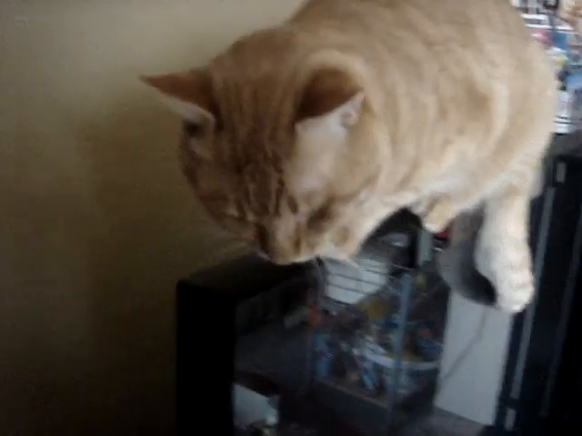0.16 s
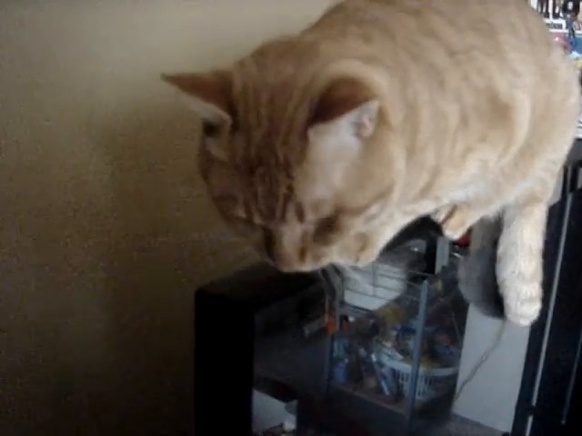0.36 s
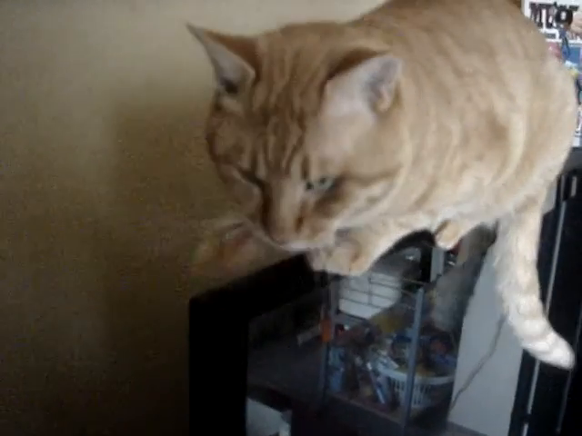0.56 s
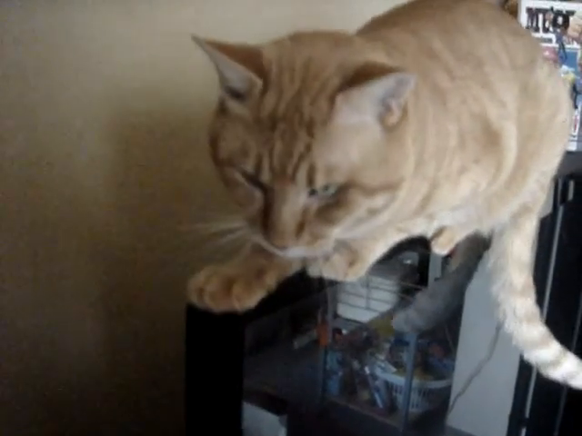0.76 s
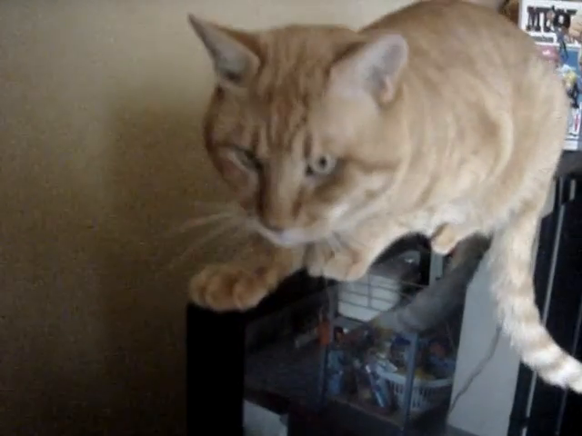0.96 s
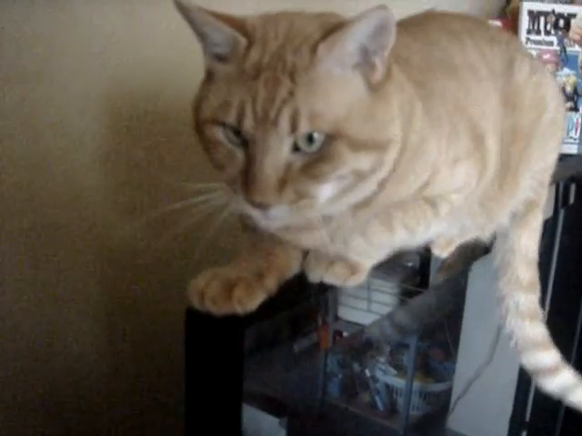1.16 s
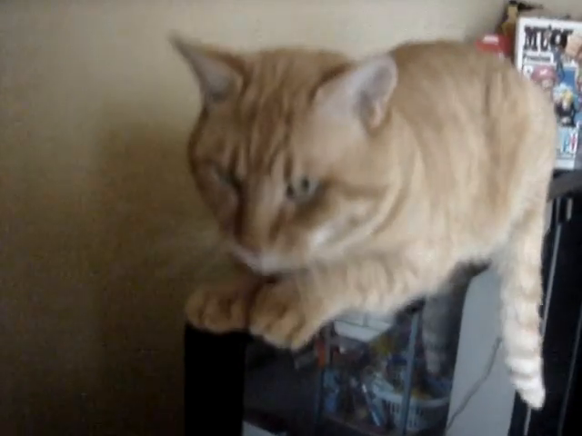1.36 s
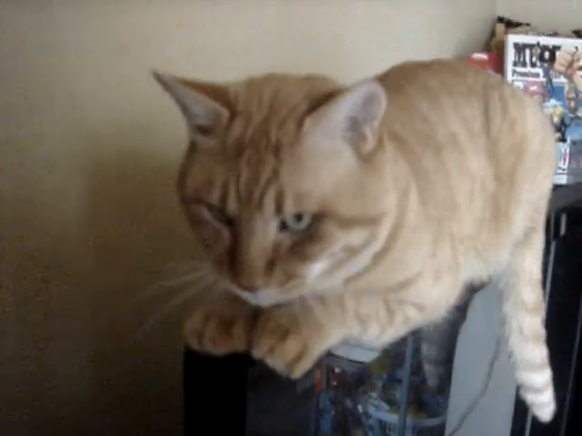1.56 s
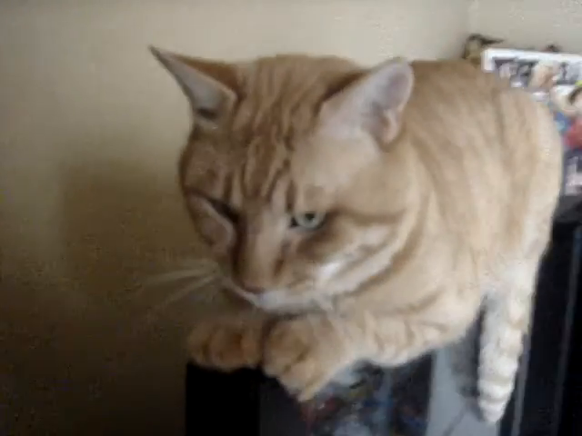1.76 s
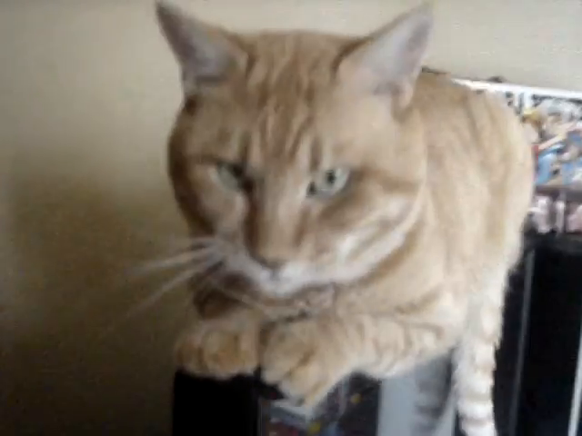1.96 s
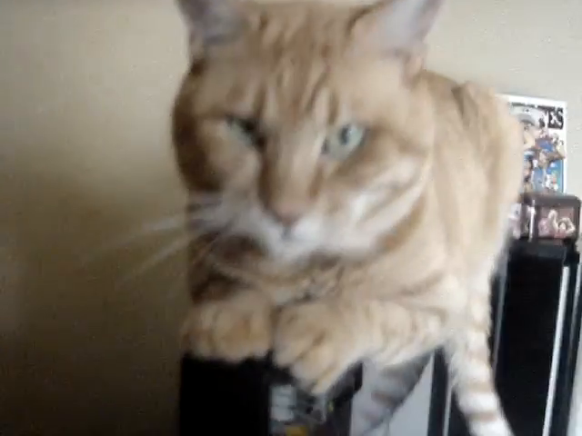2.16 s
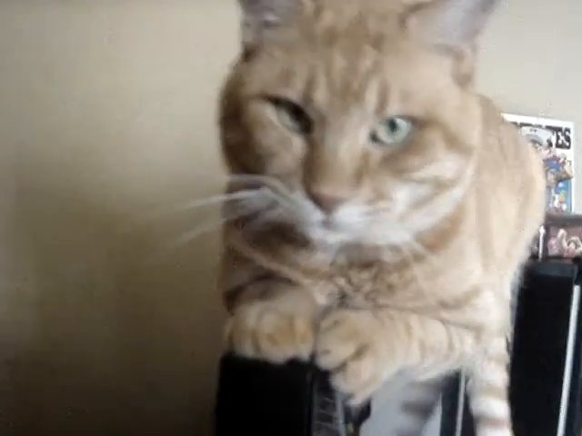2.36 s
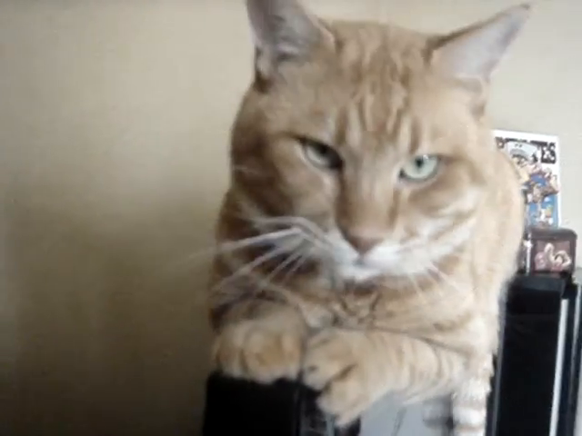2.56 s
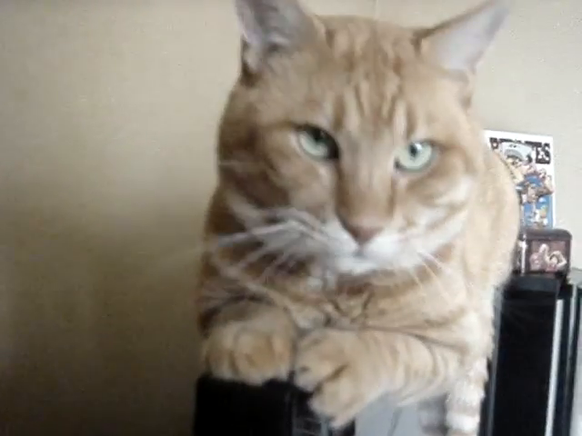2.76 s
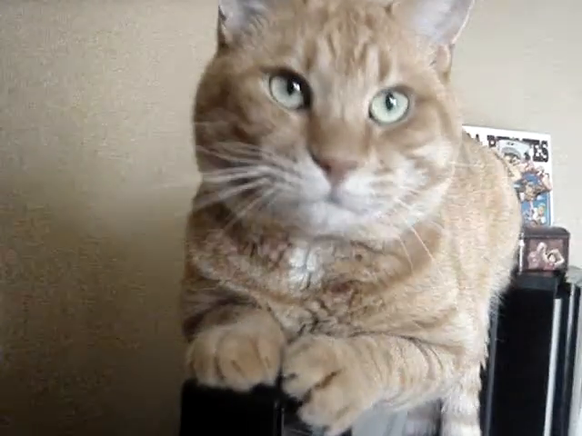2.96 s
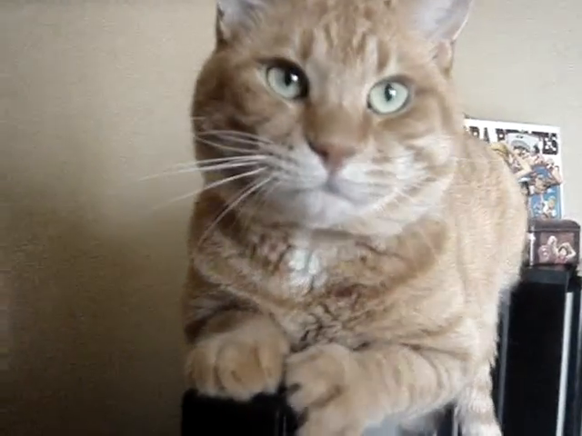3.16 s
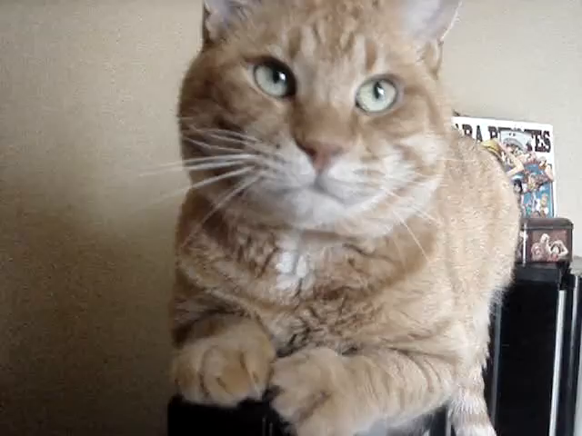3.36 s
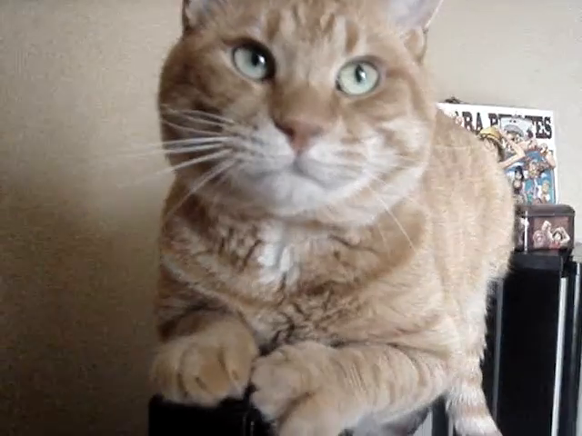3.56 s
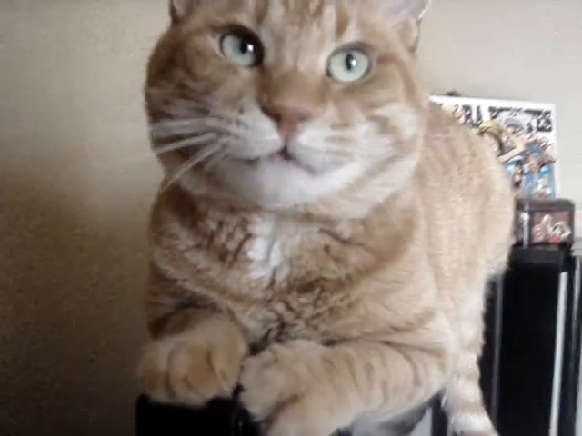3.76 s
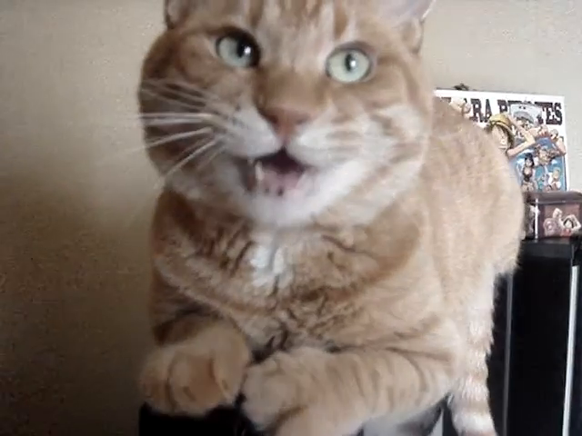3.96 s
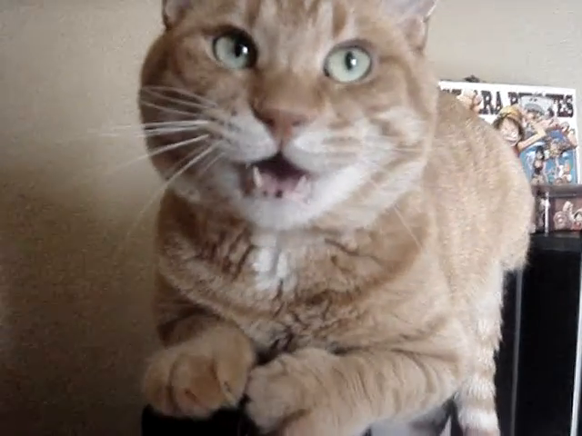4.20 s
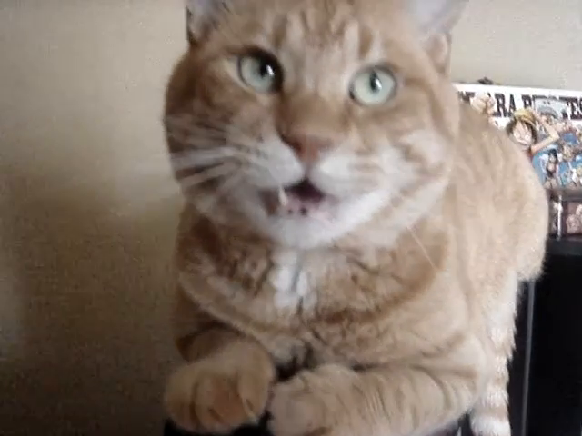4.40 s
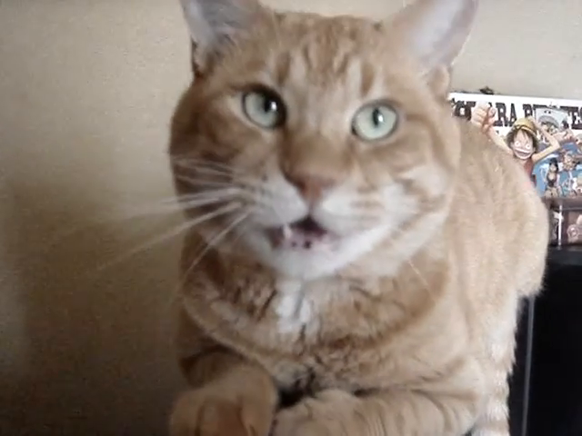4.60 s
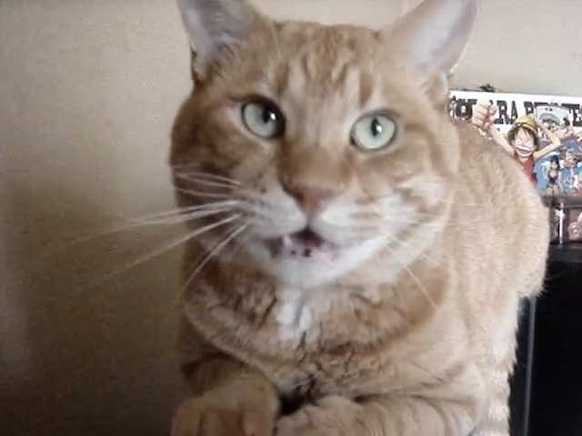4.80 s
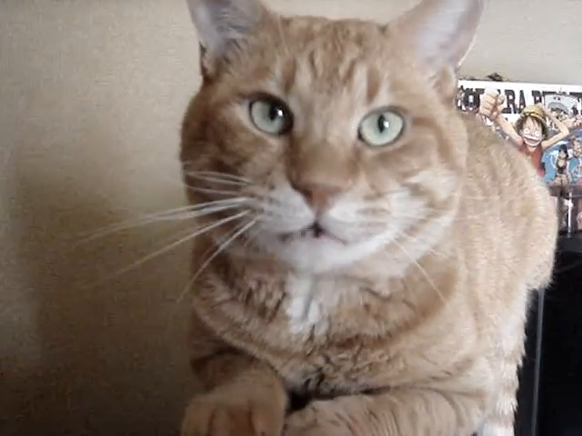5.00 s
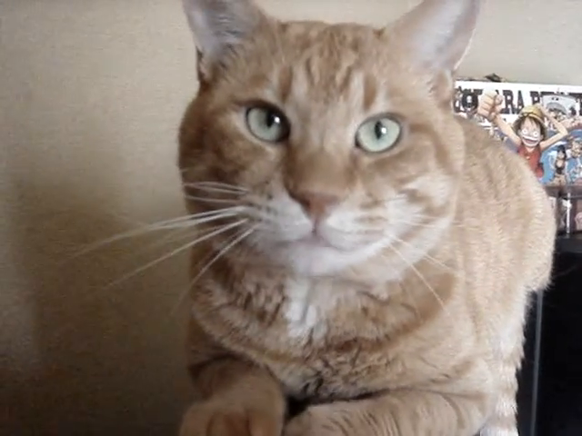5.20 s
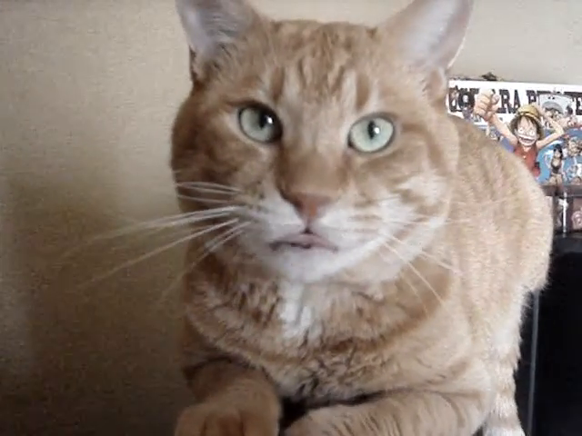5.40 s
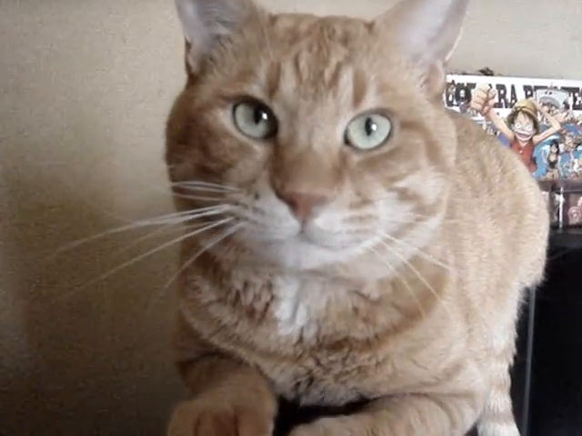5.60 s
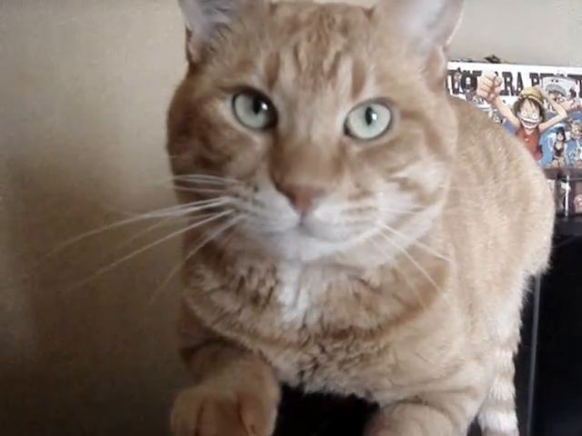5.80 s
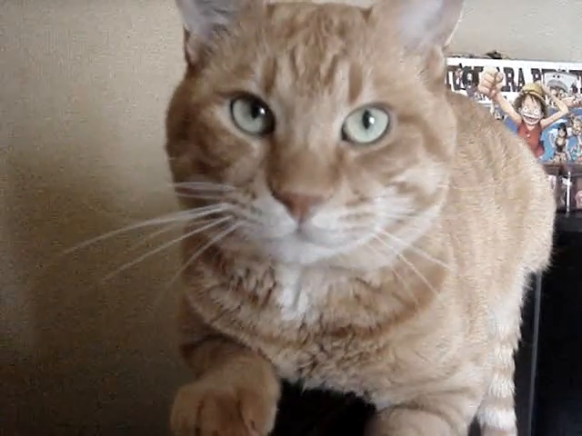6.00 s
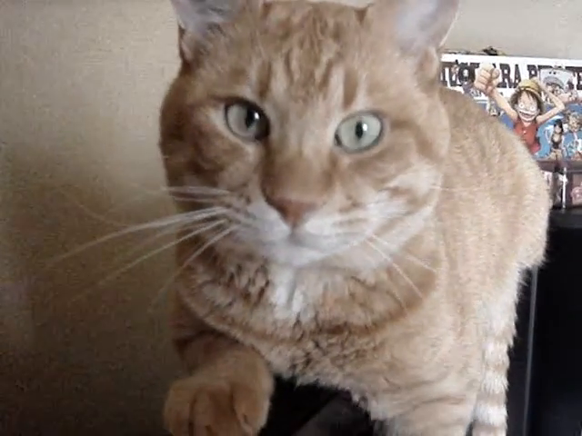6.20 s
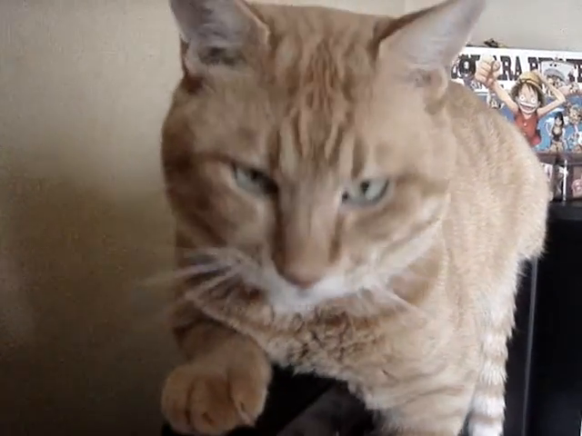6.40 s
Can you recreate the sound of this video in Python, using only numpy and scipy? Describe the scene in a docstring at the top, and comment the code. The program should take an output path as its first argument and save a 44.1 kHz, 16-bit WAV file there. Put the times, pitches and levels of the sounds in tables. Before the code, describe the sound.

A quiet small room heard through a thin little microphone, with steady soft hiss and low murmur. A faint rapid mechanical tick, about thirty stronger pulses a second, runs until 1.2 s, returns around 2.1 to 2.9 s, then continues weaker until about 6 s. Paws tap and scuff a cabinet softly at 0.55, 0.7, 0.9 and 1.25 s, then around 2.1 to 2.25 s; small finger knocks and dry ticks fall between, including a dull pop at 1.9 and 3.2 s. From 3.6 s the close cat begins a creaky, fluttering onset, rises quickly into a full, bright, nasal meow by 3.9 s, holds and slowly sinks in pitch, then breaks into a breathy purring flutter, ending near 5.0 s with a soft tap. Faint scuffs follow at 5.3 to 5.7 s, a sharper click at 5.73, and tiny clicks near 6.0 to 6.4 s. Very little echo.

```python
"""In a small room, a cat on a cabinet gives one long meow close to a pocket camera.
The call is a stack of harmonics and breath noise, with a purring flutter at its start and end.
Noise bursts ring the cabinet for tapping, scuffing paws; short swings are knocks and finger pops.
A small drive in the camera ticks as evenly timed rings, and the sounds of the cat echo faintly.
Shaped noise makes the microphone hiss and the murmur of the room."""
import sys
import numpy as np
from scipy import signal
from scipy.io import wavfile
from scipy.ndimage import uniform_filter1d

SR = 44100
rng = np.random.default_rng(int(sys.argv[2]) if len(sys.argv) > 2 else 0)


def generate_wav(signal):
    """Clip the signal to [-1, 1] and save it as 16-bit WAV at the path in sys.argv[1]."""
    frames = np.transpose(np.atleast_2d(signal))
    scaled = np.clip(frames, -1, 1) * 32767
    pcm = np.round(scaled).astype(np.int16)
    wavfile.write(sys.argv[1], SR, pcm)


N = 284356  # length in samples

# The call before flutter and unevenness: t/s, pitch f/Hz, level of the fundamental/dB
CALL = [(3.62, 229, -64), (3.63, 232, -53), (3.652, 238, -51), (3.745, 279, -45.5), (3.77, 297, -41),
        (3.805, 326, -38.5), (3.85, 343, -39.5), (3.9, 360, -36), (4.1, 358.5, -34.5), (4.24, 349, -34.5),
        (4.37, 339, -35), (4.47, 338, -36), (4.56, 333, -36.5), (4.65, 328, -38), (4.72, 324.5, -36),
        (4.8, 318.5, -35), (4.9, 307, -38), (4.98, 288, -41), (5.02, 245, -58)]
# Moving jaw and tongue, levels over the fundamental: t/s, first resonance f/Hz, level/dB,
# second resonance f/Hz, level/dB, lift of the third and fifth/dB, lift of the throat resonances/dB
JAW_AND_TONGUE = [(3.63, 446, 6, 1230, -3.5, -7, -12), (3.73, 704, 6, 1320, -3, -23, -10),
                  (3.78, 740, -5.5, 1260, -9, -9, -4), (3.88, 733, 1, 1660, -6, -11, -8),
                  (3.94, 680, 7, 1600, -10.5, -5.5, -3), (4.03, 734, 6, 1630, -4.5, 2, -1.5),
                  (4.16, 800, 7.5, 1700, -1, -6.5, -6), (4.3, 853, 7.5, 1560, -5, -5.5, 1),
                  (4.43, 810, 5.5, 1480, -5.5, 0.5, -3.5), (4.58, 810, 6, 1530, -6.5, -1.5, 3.5),
                  (4.72, 815, 2.5, 1430, -14.5, -6.5, -4), (4.82, 824, -2.5, 1310, -19, -9.5, -12),
                  (4.9, 846, -2.5, 1690, -14, -9.5, -7), (5.0, 830, 3.5, 1450, -10, -7, -3)]
# The purr muscle pinches the larynx shut: t/s, dip/dB, pitch drop (share of the pitch)
PURR_PINCHES = [(3.671, 14, .06), (3.709, 7, .11), (3.747, 3.5, .12), (3.79, 1, .03), (4.822, 1, .045),
                (4.868, 1.5, .11), (4.914, 4, .16), (4.957, 8, .14), (4.989, 13, .12)]
# Widths of the first and second resonance: width/Hz
MOVING_WIDTHS = (144, 212)
# Resonances that stay at one pitch, before their lift: f/Hz, width/Hz, level over the fundamental/dB
THIRD_RESONANCE = (2492, 150, -5)
FIFTH_RESONANCE = (4300, 250, -34)  # swells with the third
THROAT_RESONANCES = [(3042, 138, -12.5), (3400, 200, -24), (6120, 420, -32.5)]
# Unevenness of the vocal folds (0 to 1), strong at both ends of the call
CREAK_STEADY, CREAK_IN, CREAK_OUT = .04, .62, .85
CREAK_IN_S, CREAK_OUT_S = .16, .065

# Taps and scuffs on the cabinet and of the lips: t/s, level before a final factor of 0.4/dB, rise/s,
# time to fall 60 dB/s, lift of the upper body modes/(dB per octave), treble over body/dB, treble f/Hz
PAW_CONTACTS = [(0.553, -40.5, .006, 0.13, 15, -2.5, 3560), (0.6944, -44, 0.00098, 0.13, 10, 9, 2400),
                (.912, -30.5, 0.0028, .16, 1, -20, 2500), (1.253, -43.5, 0.0093, 0.11, 4, -24, 3020),
                (1.3, -57.5, 0.028, 0.15, 5, 15, 2480), (2.096, -38.5, 0.015, 0.19, 2.5, -24, 2660),
                (2.21, -37, 0.0078, 0.53, -5, -23, 2500), (2.241, -33.5, .0085, 0.17, -18, -26, 3000),
                (3.814, -56, 0.021, 0.082, -3, 14.5, 2980), (4.989, -35, 0.0072, 0.2, -4, -4, 2380),
                (5.34, -44.5, 0.0096, 0.53, 16, -27, 2500), (5.561, -42, 0.0071, 0.35, 27, -3.5, 3000),
                (5.691, -45.5, 0.025, 0.65, 23, 0.5, 2940), (5.7328, -37.5, .0016, 0.14, -17, 1, 4470)]
# Body resonances of the cabinet, before the lift: f/Hz, width/Hz, level/dB
CABINET_MODES = [(250, 120, -9.5), (422, 123, 7), (560, 200, -32), (920, 150, -1.5), (1255, 330, -14.5)]
# Claw resonances: multiple of the treble f, width/Hz, level/dB
CLAW_MODES = [(.45, 1200, -12), (1.0, 1700, 5), (1.7, 2300, -2), (2.8, 4000, -17)]

# Fingers and claws, dull pops to dry ticks: t/s, peak of the main swing/dB, f/Hz,
# length/cycles, overtone over main swing/dB
FINGER_KNOCKS = [(.695, -31, 3040, .55, -8), (1.1405, -36.5, 2580, 4, -25),
                 (1.7701, -35.5, 2080, 0.69, 4.5), (1.9146, -28, 820, 0.49, -7),
                 (2.1092, -32, 2580, 1.7, -25), (3.1851, -29.5, 304, 0.48, -18),
                 (3.8403, -38.5, 2370, 3.5, -2.5), (4.1123, -30.5, 233, .34, -2.5),
                 (4.512, -38, 220, 0.6, -18), (5.005, -28, 1311, 0.2, -22), (5.4445, -41, 4750, 2.5, -30),
                 (5.734, -25.5, 4300, 0.54, -20), (6.0374, -35.5, 340, 0.17, 0),
                 (6.126, -41, 3070, .59, -8), (6.3608, -37, 2960, .39, -8), (6.368, -33, 3000, 0.28, 0),
                 (6.382, -35, 2500, 0.23, -6)]
OVERTONE_RATIO, OVERTONE_LAG_S = 2.43, 0.00089
OVERTONE_CYCLES = 1.8  # the overtone's length in cycles, as a multiple of the main swing's

# Spells of ticking, before the step pattern: start t/s, end t/s, level/dB
TICKING_SPELLS = [(-.3, 1.2, -42.5), (2.1, 2.9, -43), (2.9, 6.0, -49)]
# Repeating strength of the steps, one in four stands out: level/dB
STEP_PATTERN = (-13, -12, 6, -15)
DRIVE_PER_S, DRIVE_START_S = 119.88, .0068
DRIVE_FADE_DB_PER_S = 126  # fades in and out around each spell

# Colour of hiss and murmur, only its shape counts: f/Hz, level/(dB per Hz)
HISS_COLOUR = [(15, -31), (25, -3), (124, -6.5), (152, 0.5), (239, -4.5), (322, 0), (356, -1.5),
               (470, -3.5), (684, -3.5), (1690, -8), (2460, -8.5), (3320, -12), (10000, -15), (13000, -113),
               (22000, -120)]
HISS_DB = -54  # overall level before the microphone
ROOM_DB = -22  # the cat sits close, so the room stays faint
EDGE_HZ = 10150  # top of the recorded band


def meow():
    """Harmonics take their levels from the mouth's resonances; breath has its own fixed ones."""
    t = np.arange(CALL[0][0], CALL[-1][0], 1 / SR)
    hz, level_db = curve(CALL, t)
    for s, dip_db, drop in PURR_PINCHES:
        # shuts slowly, bursts open
        dip_width_s = np.where(t < s, .009, .003)
        level_db = level_db - dip_db * np.exp(-((t - s) / dip_width_s) ** 2)
        # slack folds climb back to pitch
        hz = hz * (1 - drop * np.exp(-abs(t - s) / .018) * (t > s))

    creak = CREAK_STEADY + CREAK_IN * np.exp(-((t - t[0]) / CREAK_IN_S) ** 2)
    creak = creak + CREAK_OUT * np.exp((t - t[-1]) / CREAK_OUT_S)
    pitch_wobble, level_wobble = smooth_random((2, len(t)), 200, 100)
    drift = smooth_random(len(t), 1500, 700)
    sung_hz = uniform_filter1d(hz, size=200) * (1 + .045 * creak * pitch_wobble + .003 * drift)
    turns = np.cumsum(sung_hz) / SR  # cycles of the fundamental so far

    first_hz, first_db, second_hz, second_db, third_db, top_db = curve(JAW_AND_TONGUE, t)
    shapes = [(first_hz, MOVING_WIDTHS[0], first_db), (second_hz, MOVING_WIDTHS[1], second_db)]
    shapes += [(f, w, db + third_db) for f, w, db in (THIRD_RESONANCE, FIFTH_RESONANCE)]
    shapes += [(f, w, db + top_db) for f, w, db in THROAT_RESONANCES]

    voice = np.cos(2 * np.pi * turns)
    shimmer = evened(uniform_filter1d(rng.standard_normal((22, len(t) // 64 + 1)), size=25))
    for k, chance in enumerate(shimmer, 2):  # k is the harmonic number
        tract = 0
        for j, (f, w, db) in enumerate(shapes):
            # a one-pole response squared: steep skirts, and the phase turns across each peak
            tract = tract + (-1) ** j * gain_of(db) / (1 + 1j * (k * hz - f) / w) ** 2
        waver = gain_of(.5 * np.interp(np.arange(len(t)), np.arange(len(chance)) * 64, chance))
        # uneven cycles smear each harmonic
        blur = evened(uniform_filter1d(rng.standard_normal((2, len(t))), size=260))
        smear = (.014 * k + .5 * creak) * (blur[0] + 1j * blur[1])
        waver = waver * (1 - .4 * creak + smear)
        voice = voice + (waver * tract * np.exp(2j * np.pi * k * turns)).real

    # the breath puffs once per cycle
    air = rng.standard_normal(len(t)) * (0.21 + np.cos(np.pi * turns) ** 2)
    breath = resonate(air, 630, 900) + 0.86 * resonate(air, 2000, 1200)
    breath = evened(breath + 0.25 * resonate(air, 6000, 1500))
    voice = voice + gain_of(-25 + 12.0 * creak) * breath  # more breath where the folds are uneven

    loudness = np.sqrt(2) * gain_of(level_db + 2.5 * creak * level_wobble)
    out = np.zeros(N)
    add(out, t[0], loudness * voice * signal.windows.tukey(len(t), .012))
    return out


def paws():
    """A grainy burst of contact noise rings the cabinet and, brighter and shorter, the claws."""
    out, t = np.zeros(N), np.arange(SR // 3) / SR
    for s, db, rise, t60, lift_db, treble_db, hz in PAW_CONTACTS:
        grains = gain_of(2.5 * rng.standard_normal(len(t) // 50 + 1)).repeat(50)[:len(t)]
        grit = rng.standard_normal(len(t)) * grains
        body = evened(sum(gain_of(d + lift_db * np.log2(f / 420)) * resonate(grit, f, w)
                          for f, w, d in CABINET_MODES))
        # passing each claw resonance twice makes it steeper
        treble = evened(sum(gain_of(d) * resonate(resonate(grit, k * hz, w), k * hz, w)
                            for k, w, d in CLAW_MODES))
        shape = np.minimum(t / rise, 1) * gain_of(-60 * np.maximum(t - rise, 0) / t60)
        burst = body + gain_of(treble_db) * treble * shape ** .25
        add(out, s, .4 * gain_of(db) * shape * burst)
    return out


def knocks():
    """Each knock is one short swing with an overtone, mostly weaker, on its heels."""
    out, t = np.zeros(N), np.arange(1500) / SR
    for s, db, hz, cycles, overtone_db in FINGER_KNOCKS:
        add(out, s, gain_of(db) * swing(hz, cycles, t))
        overtone = swing(OVERTONE_RATIO * hz, OVERTONE_CYCLES * cycles, t)
        add(out, s + OVERTONE_LAG_S, gain_of(db + overtone_db) * overtone)
    return out


def swing(hz, cycles, t):
    """A sine that swells and dies, faster for fewer cycles; its peak is 1."""
    u = hz * t / cycles
    x = np.sin(2 * np.pi * hz * t) * u * np.exp(-1.6 * u)
    return x / abs(x).max()


def drive():
    """Evenly timed steps of uneven strength ring the case near the microphone."""
    at = np.arange(DRIVE_START_S, N / SR, 1 / DRIVE_PER_S)
    spells = []
    for start, end, db in TICKING_SPELLS:
        outside_s = np.maximum(np.maximum(start - at, at - end), 0)
        spells.append(db - DRIVE_FADE_DB_PER_S * outside_s)
    step_db = np.max(spells, axis=0) + np.resize(STEP_PATTERN, len(at))
    step_db = step_db + 3.0 * rng.standard_normal(len(at))
    steps = np.zeros(N)
    steps[(at * SR).astype(int)] = gain_of(step_db)
    t = np.arange(400) / SR
    ring = np.sin(2 * np.pi * 2750 * t) * (t / 0.0016) * np.exp(1 - t / 0.00042)
    return np.convolve(steps, ring)[:N]


def room(x):
    """Echoes are sparse taps of random sign that die away; treble is weaker but dies a bit later."""
    taps, at = np.zeros(SR // 2), np.arange(200, SR // 2 - 20, 20)
    taps[at + rng.integers(0, 20, len(at))] = rng.choice([-1., 1.], len(at))
    t = np.arange(len(taps)) / SR
    low = uniform_filter1d(taps, size=12)
    high = taps - low
    tail = low * gain_of(-60 * t / 0.48) + 0.3 * high * gain_of(-60 * t / 0.6)
    return signal.fftconvolve(x, tail / np.linalg.norm(tail))[:N]


def hiss(colour, patchy_db):
    """Hiss and murmur: random short-time spectra of one colour, with drifting patches of level."""
    frames, hz = N // 256 + 5, np.fft.rfftfreq(1024, 1 / SR)
    a, b, patches = rng.standard_normal((frames, 513, 3)).T
    patches = uniform_filter1d(patches, size=14, axis=0)  # across frequency
    patches = evened(uniform_filter1d(patches, size=8, axis=1))  # across time
    f, db = np.transpose(colour)
    colour_db = np.interp(np.log(hz + 1), np.log(f + 1), db)[:, None]
    spectra = (a + 1j * b) * gain_of(colour_db + patchy_db * patches)
    return evened(signal.istft(spectra, nperseg=1024, noverlap=768)[1][:N])


def gain_of(db):
    """Turn decibels into a factor."""
    return 10 ** (np.asarray(db) / 20)


def evened(x):
    """Scale to an average (RMS) level of 1."""
    return x / np.sqrt(np.mean(x ** 2) + 1e-20)


def smooth_random(shape, first_size, second_size):
    """Slow random wandering: noise averaged twice, sizes in samples."""
    x = uniform_filter1d(rng.standard_normal(shape), size=first_size)
    return evened(uniform_filter1d(x, size=second_size))


def curve(rows, t):
    """Draw straight lines between the rows of a table whose first column is time."""
    s, *columns = np.transpose(rows)
    return [np.interp(t, s, c) for c in columns]


def add(mix, s, sound):
    """Mix a sound in, starting at s seconds."""
    part = mix[round(s * SR):][:len(sound)]
    part += sound[:len(part)]


def resonate(x, hz, width):
    """A two-pole resonance of gain about 1."""
    r = np.exp(-np.pi * width / SR)
    return 2 * signal.lfilter([1 - r], [1, -r * np.exp(2j * np.pi * hz / SR)], x).real


def scene():
    """The cat with its faint echo, the camera case without echo, and the background."""
    cat = meow() + paws()
    case = knocks() + drive()
    background = gain_of(HISS_DB) * hiss(HISS_COLOUR, patchy_db=1.49)
    return (cat + gain_of(ROOM_DB) * room(cat) + case + background)[None]


def record(dry):
    """The small microphone loses the deep bass; then the band limit cuts the top."""
    thin = signal.sosfilt(signal.butter(1, 90, "high", fs=SR, output="sos"), dry)
    band_limit = signal.firwin(1023, EDGE_HZ, window=("kaiser", 9), fs=SR)
    return signal.oaconvolve(thin, band_limit[None], "same")


dry = scene()
out = record(dry)
generate_wav(out)
```